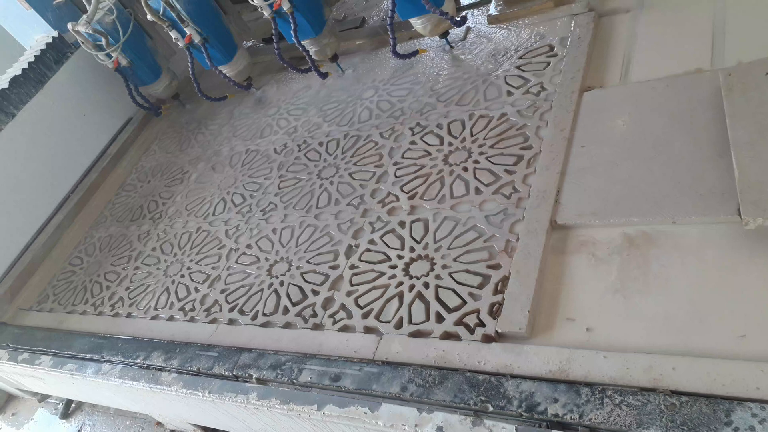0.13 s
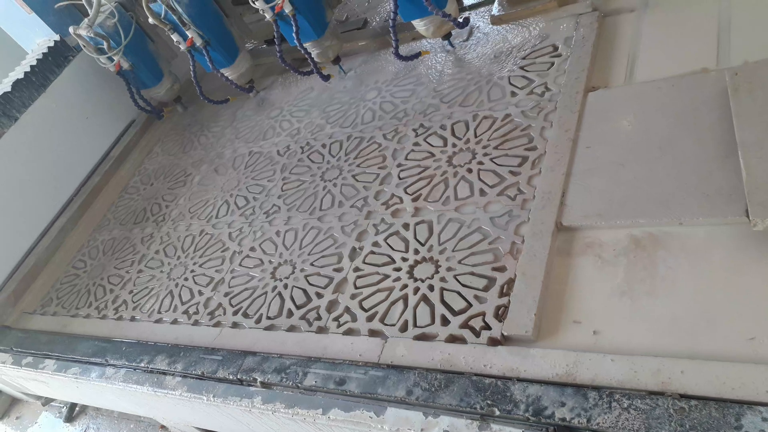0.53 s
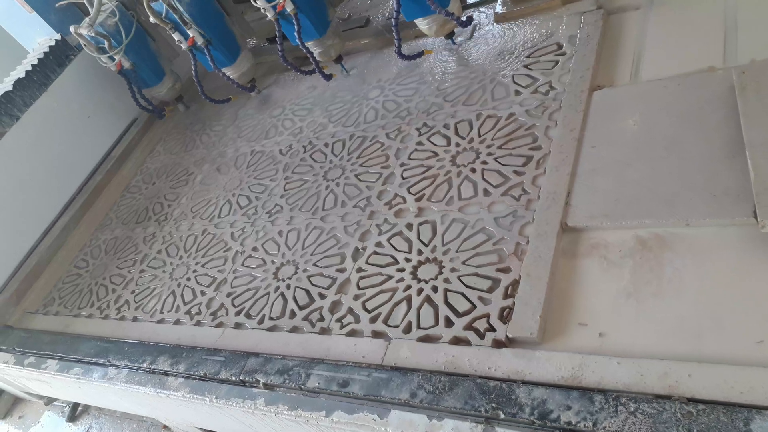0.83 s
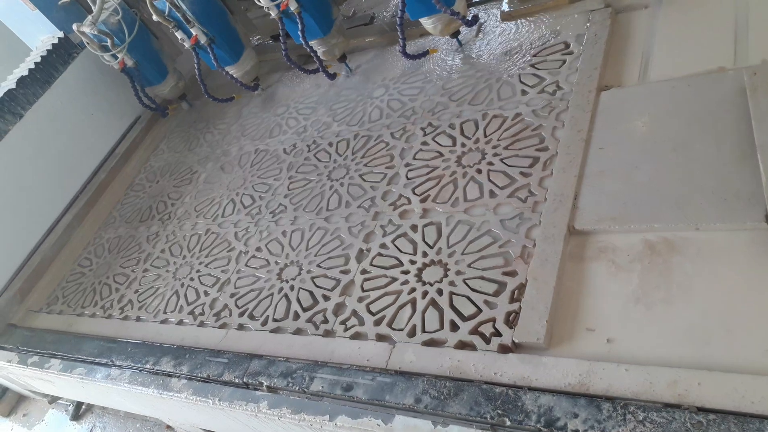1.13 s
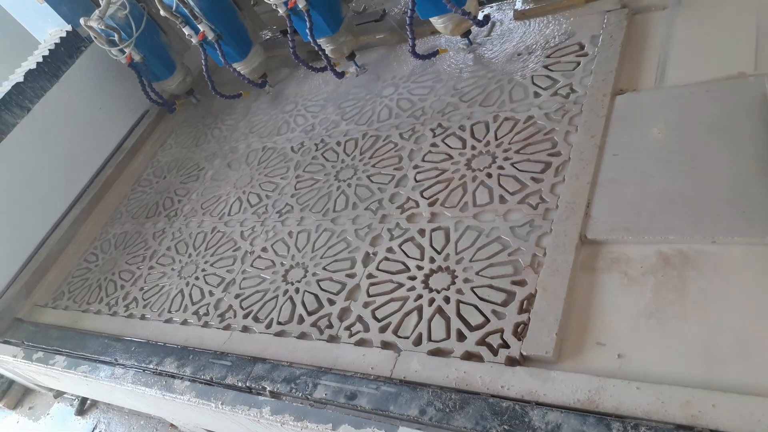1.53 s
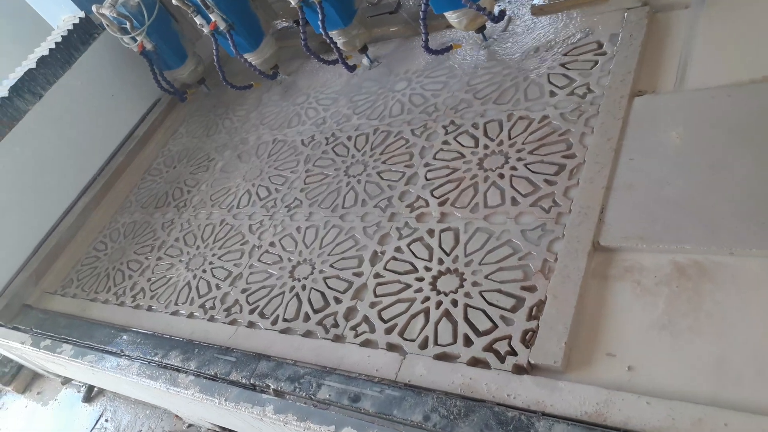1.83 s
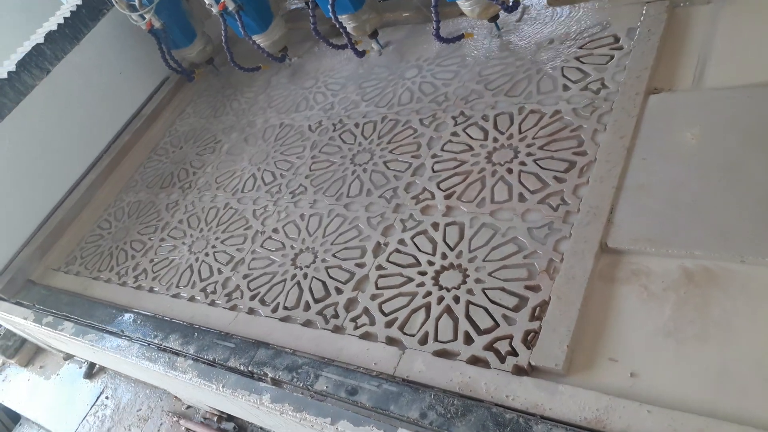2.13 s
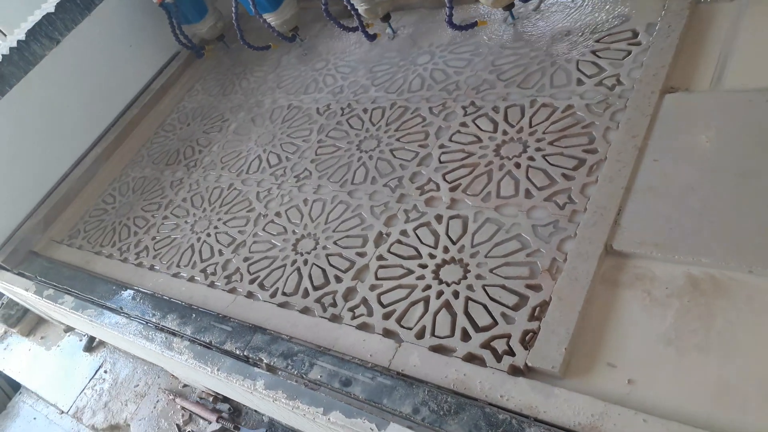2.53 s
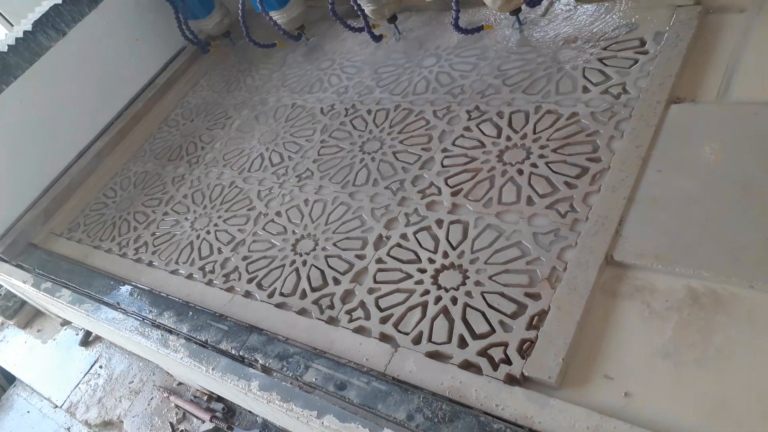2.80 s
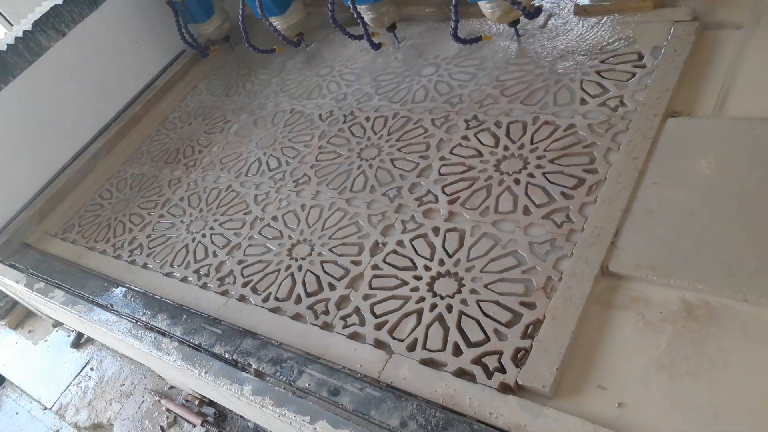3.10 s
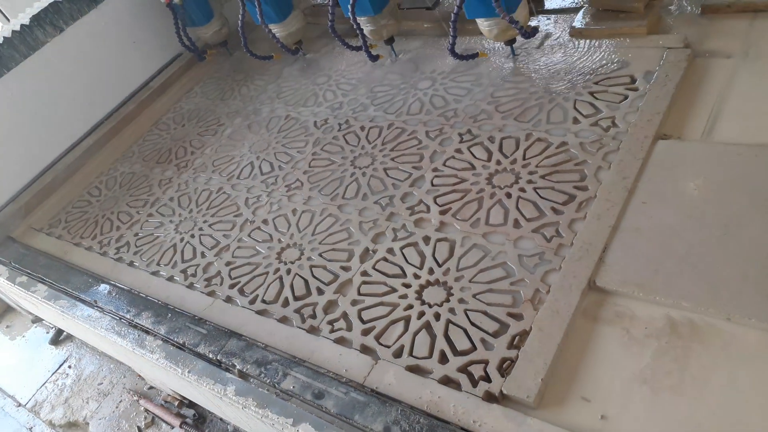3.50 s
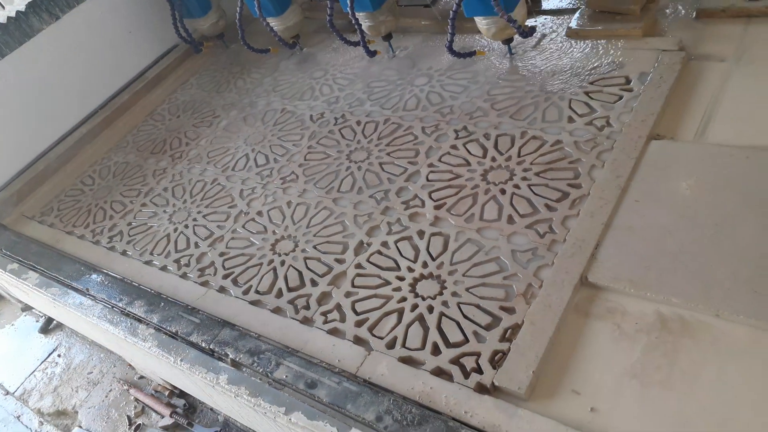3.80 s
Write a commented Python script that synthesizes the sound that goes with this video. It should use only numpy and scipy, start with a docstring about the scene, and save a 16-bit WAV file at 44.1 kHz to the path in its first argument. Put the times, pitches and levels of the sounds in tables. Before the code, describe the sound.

A multi-head stone carving machine starts abruptly, already running, and drones throughout: strong low hum, thin steady high whine, uneven spindle throb and harsh gritty buzz. Short metallic squeals come and go over body roar, bearing whirr and faint water hiss. Soft low handling bumps fall near 0.6 and 1.1 seconds. Around 3.3 the pitch rises slightly; from 3.5 the grinding eases, still humming. Close, dry workshop, mono.

```python
"""The strong motor hum of a multi-head carving machine cutting a wet stone slab: workshop, close, dry, mono.
The hum and a thin drive whine are slowly wavering sines over four spindles, three cutting and one nearly free.
The cutting spindles slow under load; their overtones buzz and their grinding noise pulses once a turn.
Brief squeals, bearing whirr, hissing cooling water and a body roar fill in; the cut eases near the end.
Low handling bumps at about 0.6 and 1.1 s are swells of low noise over its own faint rumble."""
import sys
import numpy as np
from scipy import signal
from scipy.fft import rfft, irfft
from scipy.io import wavfile
from scipy.ndimage import uniform_filter1d, minimum_filter1d

SR = 44100
rng = np.random.default_rng(int(sys.argv[2]) if len(sys.argv) > 2 else 0)


def to_wav(s):
    """Save 16-bit WAV."""
    ch = np.atleast_2d(s).T  # columns
    pcm = np.round(np.clip(ch, -1, 1) * 32767)  # PCM
    wavfile.write(sys.argv[1], SR, pcm.astype(np.int16))


N = 174195
T = np.arange(N) / SR

# Noise colour of the low handling bumps and faint rumble, shape only: pitch_hz, density_db [dB per Hz]
HANDLING_SPECTRUM = [(20, -16), (42, -24), (58, 0), (72, 9), (95, -14), (160, -26.5)]
# Level of the faint rumble, rising for the handling bumps: time_s, level_db
HANDLING_LEVEL = [(.1, -53), (.45, -52), (.65, -40), (.88, -49), (1.1, -40), (1.24, -54), (1.5, -50),
                  (2, -56), (2.7, -63), (3.95, -60)]
# Noise colour of gantry and slab, shape only: pitch_hz, density_db [dB per Hz]
BODY_SPECTRUM = [(20, -45), (60, -36), (90, -23.5), (130, -14), (170, -9), (205, -12), (280, -0.5),
                 (380, -7.5), (470, -4.5), (580, -9), (680, -3), (850, -6.5), (1020, 0.5), (1180, -5),
                 (1350, 1), (1550, -9.5), (1850, -9), (2300, -29), (5000, -50)]
# Noise colour of the cooling water, shape only: pitch_hz, density_db [dB per Hz]
SPRAY_SPECTRUM = [(2000, -18), (6000, -17), (8000, -12.5), (9400, -16), (10500, -11.5), (12300, -5),
                  (13700, -3.5), (15000, 0), (15700, 2), (17000, -7)]
# Noise colours of the grinding and its bright scrape, shape only: pitch_hz, density_db [dB per Hz]
GRIND_SPECTRUM = [(500, -30), (1400, -13.5), (1950, -1), (2200, -4.5), (2550, -6), (2900, -5), (3400, 1),
                  (3750, 0.5), (4100, -2), (4600, -12.5), (5200, -10), (6400, -30), (9000, -50)]
SCRAPE_SPECTRUM = [(2000, -27), (3600, 0), (4800, 1), (5200, -1), (5600, -2.5), (6400, -1), (7300, -7.5),
                   (8000, -18), (9500, -37), (16000, -55)]
# Noise levels, of which only the swing about each mean is used:
# time_s, body_db, grind_db, scrape_db, spray_db
NOISE_LEVELS = [(0.09, -17.5, -15.5, -27.5, -33.5), (0.22, -20.5, -17.5, -29, -36),
                (0.39, -20.5, -18, -25, -35), (0.58, -22, -18, -26.5, -35.5),
                (0.85, -21.5, -15.5, -25.5, -36), (1.03, -21.5, -19.5, -23.5, -36.5),
                (1.21, -19.5, -19, -27, -38), (1.33, -18.5, -20.5, -26, -34), (1.35, -19, -19, -30, -36.5),
                (1.67, -20, -20, -28, -36.5), (2.04, -20.5, -19, -26.5, -36.5),
                (2.45, -24.5, -21, -32, -39.5), (2.92, -22, -18.5, -32.5, -38),
                (3.09, -22.5, -18, -34.5, -38), (3.22, -22, -15.5, -25.5, -37),
                (3.34, -18.5, -16.5, -24.5, -31), (3.48, -22.5, -16, -24, -31.5),
                (3.6, -25, -27, -35, -46.5), (3.86, -23, -18, -40, -43), (3.93, -27, -21, -40, -43)]
# Bearing whirr, colour read at multiples of shaft speed: pitch_hz, level_db
BEARING_COLOUR = [(700, -31), (1050, -43), (1400, -37), (1750, -39), (2100, -34), (2450, -41.5),
                  (3150, -34.5), (3850, -39.5), (4550, -38), (6000, -63), (7300, -52), (8400, -63),
                  (10000, -64), (12300, -58), (15000, -61)]
# Brief singing of a bit on one overtone, and a faint high whistle of the cooling water as the cut eases (the
# 12.3 kHz row): start_s, length_s, pitch_hz, level_db
SQUEALS = [(0.077, .11, 5850, -28), (0.117, 0.1, 1039, -22), (0.177, .65, 4749, -29),
           (.32, 0.13, 2380, -26), (0.326, 0.16, 3090, -22), (0.365, 0.18, 2715, -26),
           (0.676, 0.3, 2102, -24), (1.044, 0.23, 3104, -21.5), (1.187, 0.36, 2380, -25),
           (1.283, 0.05, 1060, -22), (1.68, 0.56, 2037, -27), (2.193, 0.15, 2040, -24.5),
           (2.374, 0.16, 700, -29), (2.563, .15, 700, -28.5), (2.64, 0.49, 2013, -23),
           (2.94, 0.18, 2730, -23.5), (3.32, 0.21, 3130, -26), (3.38, 0.068, 3500, -21),
           (3.368, .12, 3800, -22.5), (3.52, .36, 12300, -55), (3.68, 0.26, 1400, -30)]
# Overtones of the most lightly loaded spindle: multiple [of shaft speed], level_db
FREE_ORDERS = [(2, -32.5), (3, -22.5), (4, -39.5), (5, -28), (6, -31), (7, -37), (8, -41), (10, -37.5)]
# Gain on those overtones, which fade as the bit moves on: time_s, gain_db
FREE_GAIN = [(.07, 3), (.8, 3), (1.35, -0.5), (1.7, -1.5), (2.1, -4.5), (2.4, -13.5), (3.5, -9.5),
             (3.95, -12)]
# Throb at shaft speed, where the spindles beat against each other: time_s, level_db (before a small trim)
THROB_LEVEL = [(0.08, -27), (0.12, -20.5), (0.29, -16.5), (0.46, -31), (0.74, -20), (0.97, -26),
               (1.14, -19.5), (1.3, -20), (1.47, -41.5), (1.8, -16.5), (2.03, -30.5), (2.12, -23.5),
               (2.49, -22), (2.59, -36.5), (2.72, -18.5), (2.83, -18), (2.95, -25.5), (3.43, -20),
               (3.57, -32), (3.72, -18), (3.84, -19.5), (3.95, -34)]
# Common speed of the cutting spindles: time_s, speed_hz [turns per second]
CUTTING_SPEED = [(.07, 346), (.2, 344.5), (.35, 339), (.9, 340.3), (1.35, 342.7), (1.8, 341.3),
                 (2.3, 339.5), (2.6, 338.3), (3.05, 339), (3.25, 342), (3.38, 347), (3.55, 347),
                 (3.7, 348.5), (3.95, 347)]
# Cutting spindles: speed_offset_hz, gain_db, ring_hz [ring of the bit], ring_lift_db
BITS = [(-3, -0.5, 2020, 3), (0, 0.5, 2196, 10.5), (3, -2.5, 4600, 9.5)]
# Colour of a cutting bit's overtones: pitch_hz, level_db (before the bit's own gain and ring)
BIT_COLOUR = [(340, -50.5), (680, -45.5), (1020, -43.5), (1360, -35.5), (1700, -37.5), (2050, -35.5),
              (2700, -35), (3100, -31.5), (3450, -33), (3800, -32.5), (4150, -37.5), (4800, -38.5),
              (5500, -42.5), (6400, -41.5), (7300, -51.5), (8000, -52)]
# Gain on all the cutting overtones: time_s, gain_db
BUZZ_GAIN = [(.07, 0.5), (.8, -0.5), (1.4, -0.5), (1.7, -1), (2.1, -1.5), (2.45, -2), (3.0, 0), (3.4, 1.5),
             (3.5, -2.5), (3.58, -5.5), (3.75, -4.5), (3.95, -8.5)]
# Main motor hum: time_s, level_db
HUM_LEVEL = [(0.09, -12.5), (0.31, -10.5), (0.83, -13.5), (1.27, -12), (1.81, -13.5), (2.54, -11.5),
             (3.38, -11), (3.81, -12), (3.88, -16), (3.95, -30)]
# Overtones of the hum: multiple [of the hum pitch], level_db
HUM_ORDERS = [(2, -38.5), (3, -34.5), (4, -37), (5, -41), (6, -40.5), (7, -44), (16, -40), (18, -49),
              (20, -44), (22, -49)]
# Weaker whines of the drives: pitch_hz, level_db
WEAK_WHINES = [(4247, -48), (4748, -39.5), (11946, -62), (15116, -55), (15466, -56)]
# Main drive whine: time_s, level_db (before a small trim)
DRIVE_LEVEL = [(0.09, -23.5), (0.76, -23.5), (0.9, -20), (1.63, -22.5), (1.74, -30), (2.07, -17),
               (2.41, -28), (2.62, -23.5), (3.34, -26), (3.42, -22), (3.45, -29), (3.93, -21.5)]

# Pitches [Hz]
HUM_HZ, DRIVE_HZ, FREE_HZ, THROB_HZ = 249.9, 3518, 350.3, 349.2
# Noise levels [dB rms], before the level swings and flicker
BODY_DB, GRIND_DB, SCRAPE_DB, SPRAY_DB = -24.5, -22.5, -29, -35
# Random spread of level [dB]
WHINE_WAVER_DB, GRIT_DB, SPLASH_DB, SQUEAL_FLICKER_DB = 0.2, 1.07, 0.9, 1.5
# Swell and flicker of each overtone
CHATTER_DB, CHATTER_PER_S, FLICKER_DB = 3.5, 9, 2
# Random spread of pitch [fraction]: slow and fast for the cutting spindles, and for squeals
SPEED_WANDER, SPEED_JITTER, SQUEAL_WANDER = 0.001315, 0.00305, .003
# Width of a bit's ring at half its lift in dB; depth of the once-a-turn pulse [fraction]
RING_WIDTH_HZ, TURN_DEPTH = 392, 0.25
# Abrupt start, limiter window, upper edge of the pass band
START_S, START_RISE_S, LIMIT_S, TOP_HZ = .069, 0.001, .012, 15750


def undb(db):
    """Amplitude factor of a level in dB."""
    return 10 ** (np.asarray(db) / 20)


def curve(rows, axis=1):
    """One column of a table, joined by straight lines in time."""
    rows = np.array(rows, float)
    return np.interp(T, rows[:, 0], rows[:, axis])


def swing(axis):
    """Gain of one noise level curve about its mean in dB."""
    db = curve(NOISE_LEVELS, axis=axis)
    return undb(db - db.mean())


def colour(points, hz):
    """Gain of a spectrum at the given frequencies, joined along log frequency."""
    points = np.array(points, float)
    log_hz = np.log(np.maximum(hz, 1))
    return undb(np.interp(log_hz, np.log(points[:, 0]), points[:, 1]))


def noise(points):
    """Gaussian noise shaped to the given spectrum, rms 1."""
    bins_hz = np.arange(N // 2 + 1) * SR / N
    shaped = irfft(rfft(rng.standard_normal(N)) * colour(points, bins_hz), N)
    return shaped / shaped.std()


def walk(rate):
    """Smooth chance that changes about rate times a second, spread 1."""
    count = int(8 * rate * N / SR) + 8
    hz = np.arange(count // 2 + 1) * SR / N
    smooth = irfft(rfft(rng.standard_normal(count)) / (1 + (2 * hz / rate) ** 2), count)
    smooth = (smooth - smooth.mean()) / smooth.std()
    return np.interp(T, np.linspace(0, T[-1], count), smooth)


def turning(hz):
    """Angle of a shaft or tone in radians, from a random start."""
    turns = np.cumsum(hz * np.ones(N)) / SR
    return 2 * np.pi * (turns + rng.random())


def tone(angle, db):
    """A sine of the given rms level."""
    return np.sqrt(2) * undb(db) * np.sin(angle)


def partial(angle, db):
    """An overtone of a spindle, which swells and flickers as the contact changes."""
    chatter_db = CHATTER_DB * walk(CHATTER_PER_S)
    flicker_db = FLICKER_DB * walk(45)
    # The trim offsets the level that the random swells add
    return tone(angle + 2 * np.pi * rng.random(), db + chatter_db + flicker_db - 2.5)


def handling():
    """Low handling bumps over a faint rumble: low noise whose level rises for each bump."""
    return noise(HANDLING_SPECTRUM) * undb(curve(HANDLING_LEVEL))


def body():
    """Gantry and slab roar under the tools as coloured noise with a flickering level."""
    return noise(BODY_SPECTRUM) * swing(axis=1) * undb(BODY_DB + 1.2 * walk(25))


def spray():
    """Cooling water hisses and spatters off the bits: bright noise with a fast random level."""
    spatter = walk(500)
    return noise(SPRAY_SPECTRUM) * swing(axis=4) * undb(SPRAY_DB + SPLASH_DB * spatter)


def bearings(count=43):
    """A fine metallic whirr at multiples of shaft speed, which shows when the cut eases."""
    angle = turning(FREE_HZ * (1 + 0.00089 * walk(6) + 0.00081 * walk(90)))
    whirr = 0
    for k in range(2, count + 1):
        whirr = whirr + colour(BEARING_COLOUR, k * FREE_HZ) * partial(k * angle, -1)
    return whirr


def squeals():
    """Short wavering notes, as a bit sings on one overtone or the cooling water whistles faintly, swell out of
    the buzz and sink back."""
    out = 0
    for start_s, length_s, pitch_hz, level_db in SQUEALS:
        progress = np.clip((T - start_s) / length_s, 0, 1)
        swell = np.sqrt(np.abs(np.sin(np.pi * progress)))
        angle = turning(pitch_hz * (1 + SQUEAL_WANDER * walk(80)))
        out = out + swell * tone(angle, level_db + SQUEAL_FLICKER_DB * walk(35))
    return out


def free_spindle():
    """A spindle near full speed; its unbalance throbs against that of its neighbours."""
    angle = turning(FREE_HZ * (1 + 0.00153 * walk(3.85) + 0.002 * walk(62)))
    throb_angle = turning(THROB_HZ * (1 + 0.0028 * walk(6.6)))
    throb = tone(throb_angle, curve(THROB_LEVEL) - .3)
    overtones = sum(partial(round(k) * angle, db) for k, db in FREE_ORDERS)
    return throb + undb(curve(FREE_GAIN)) * overtones


def cutting(count=22):
    """Each loaded bit strikes the stone once a turn: a rough buzz and a pulse of grinding noise."""
    speed = curve(CUTTING_SPEED)
    buzz, grind, scrape = 0, 0, 0
    for offset_hz, gain_db, ring_hz, lift_db in BITS:
        hz = speed + offset_hz
        angle = turning(hz * (1 + SPEED_WANDER * walk(7.96) + SPEED_JITTER * walk(150)))
        for k in range(1, count + 1):
            line_hz = k * hz.mean()
            # Overtones near the ring of the bit are lifted
            ring_db = lift_db / (1 + (2 * (line_hz - ring_hz) / RING_WIDTH_HZ) ** 2)
            buzz = buzz + colour(BIT_COLOUR, line_hz) * partial(k * angle, gain_db + ring_db)
        contact = 1 + TURN_DEPTH * np.cos(angle)
        grind = grind + noise(GRIND_SPECTRUM) * contact
        scrape = scrape + noise(SCRAPE_SPECTRUM) * contact
    grind = swing(axis=2) * undb(GRIND_DB) * grind / grind.std()
    scrape = swing(axis=3) * undb(SCRAPE_DB) * scrape / scrape.std()
    return undb(curve(BUZZ_GAIN)) * buzz + undb(GRIT_DB * walk(90)) * (grind + scrape)


def motors():
    """The steady hum with its overtones, and the whine of the drives, all gently wavering sines."""
    angle = turning(HUM_HZ * (1 + 0.0006 * walk(4.3)))
    out = tone(angle, curve(HUM_LEVEL))
    for k, level_db in HUM_ORDERS:
        out = out + tone(round(k) * angle + 0.8 * walk(5), level_db + 2.8 * walk(6.2))
    for pitch_hz, level_db in WEAK_WHINES:
        out = out + tone(turning(pitch_hz) + 0.28 * walk(28), level_db + WHINE_WAVER_DB * walk(3.3))
    drive_db = curve(DRIVE_LEVEL) - .5 + WHINE_WAVER_DB * walk(25)
    return out + tone(turning(DRIVE_HZ) + 0.24 * walk(25), drive_db)


def scene():
    """All layers summed to one channel, from the background to the main source."""
    background = handling() + body() + spray() + bearings()
    tools = squeals() + free_spindle() + cutting()
    return (background + tools + motors())[None]


def record(dry):
    """The sound starts abruptly; a limiter holds the highest peaks and the top is cut."""
    y = dry * np.clip((T - START_S) / START_RISE_S, 0, 1)
    size = int(LIMIT_S * SR)
    peak_gain = 1 / np.maximum(np.abs(y), 1)
    # Hold the lowest gain over the window, then smooth it
    y = y * uniform_filter1d(minimum_filter1d(peak_gain, size), size)
    low_pass = signal.ellip(12, .1, 80, TOP_HZ, fs=SR, output="sos")
    return signal.sosfilt(low_pass, y)


dry = scene()
out = record(dry)
to_wav(out)
```